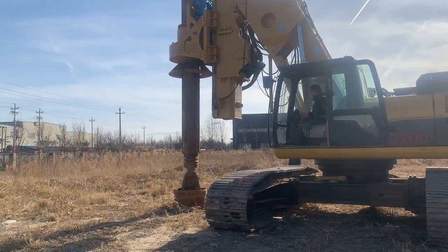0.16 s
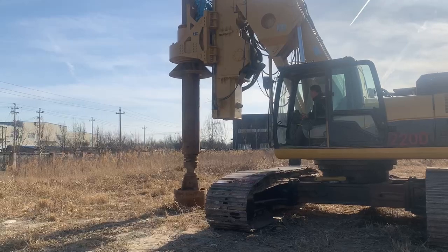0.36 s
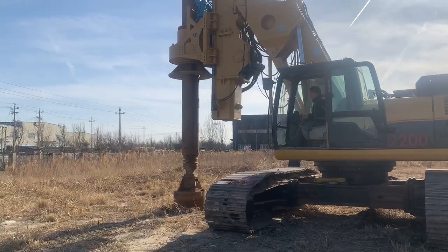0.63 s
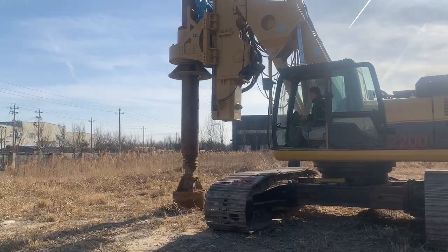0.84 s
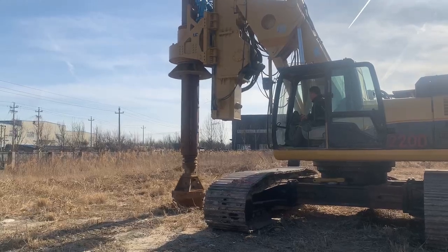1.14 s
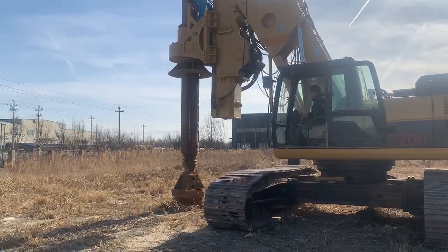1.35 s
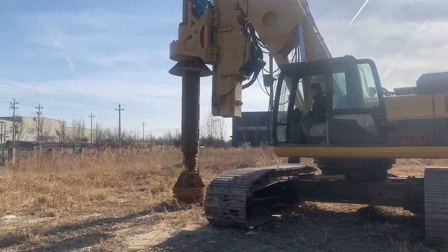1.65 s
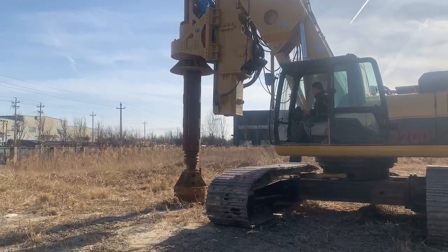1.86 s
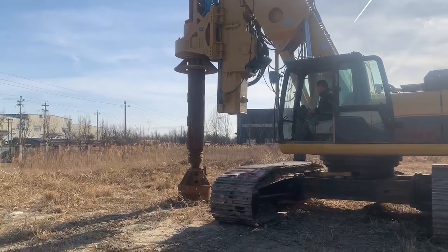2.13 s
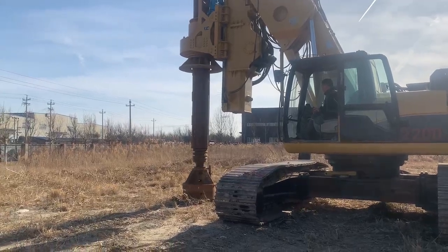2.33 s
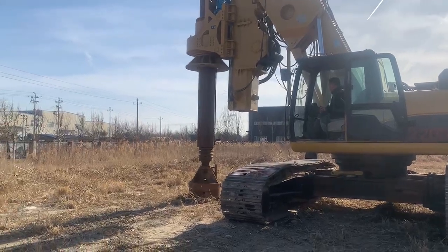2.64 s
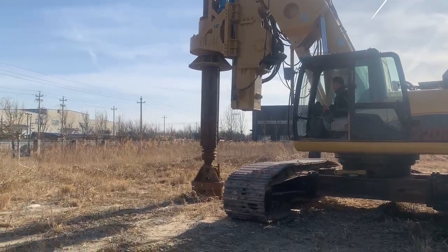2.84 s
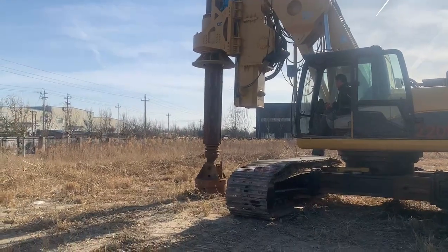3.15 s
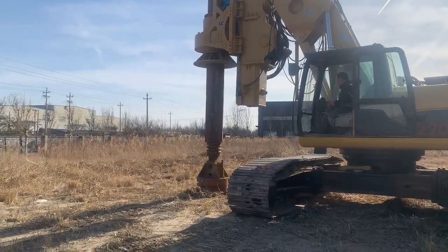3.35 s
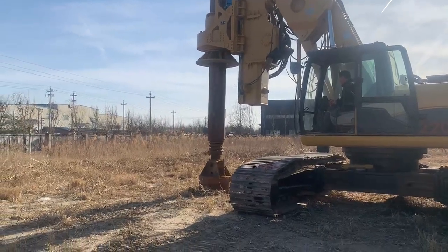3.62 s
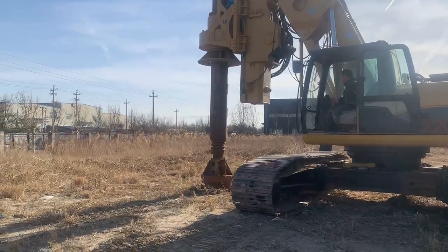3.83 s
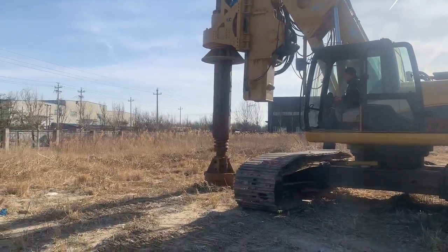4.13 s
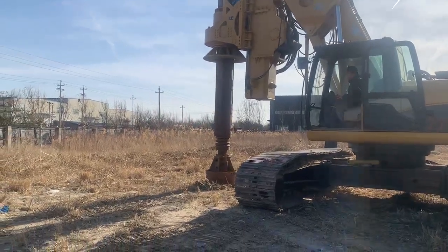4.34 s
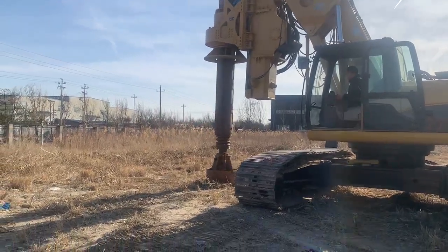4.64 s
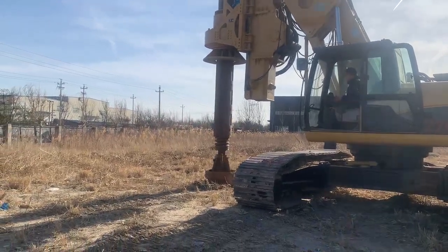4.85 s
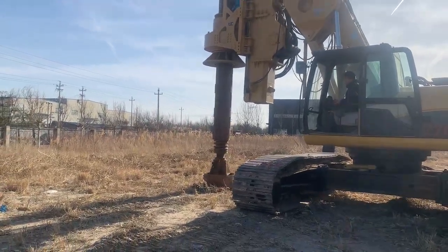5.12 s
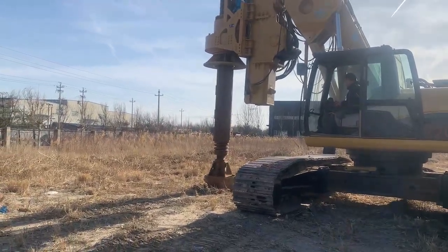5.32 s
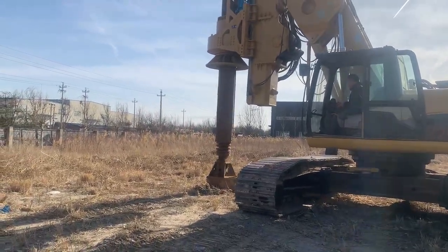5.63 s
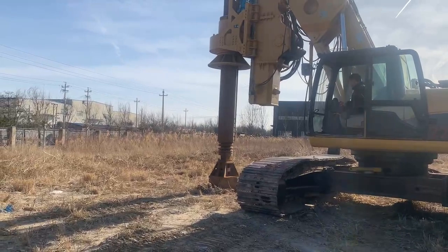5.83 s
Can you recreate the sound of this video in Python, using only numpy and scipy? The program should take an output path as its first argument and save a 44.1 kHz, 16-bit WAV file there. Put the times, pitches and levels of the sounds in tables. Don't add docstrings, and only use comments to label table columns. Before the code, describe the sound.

A big diesel drilling rig drones steadily in an open field while its heavy bar shudders and knocks hard, loudest past the middle.

```python
import sys
import numpy as np
from scipy import signal
from scipy.fft import rfft, irfft
from scipy.io import wavfile

SR = 44100
rng = np.random.default_rng(int(sys.argv[2]) if len(sys.argv) > 2 else 0)


def invert_db(level):
    return 10 ** (np.asarray(level, dtype=float) / 20)


def inscribe(sig):
    pcm = np.round(np.clip(np.atleast_2d(sig).T, -1, 1) * 32767)
    wavfile.write(sys.argv[1], SR, pcm.astype(np.int16))


N = 263718
TIME = np.arange(N) / SR

# (time [s], four-stroke cycle rate [1/s])
ENGINE_SPEED = [(0, 14.80), (1.4, 14.80), (2.2, 14.816), (2.65, 14.81), (3.0, 14.768), (3.8, 14.735),
                (4.2, 14.747), (5.05, 14.75), (5.4, 14.82), (5.98, 14.826)]
# (multiple [per cycle], right level [dB], left minus right [dB], waver [dB])
ENGINE_TONES = [(6, -36, -1, 2), (24, -26, 0, 1.5), (36, -38, -1.5, 3), (48, -29.5, -5, 1.1),
                (60, -42, -3, 3), (9, -46, -2, 2), (15, -47, 0, 2), (21, -41, 1, 2), (27, -40, -1, 2)]
# (time [s], frequency [Hz], level [dB])
FAN_GEAR = [(0, 926, -37), (.22, 921.5, -36), (.45, 925, -36), (2.4, 922, -36), (2.8, 911.5, -37.5),
            (3.3, 908.5, -38), (3.62, 920, -39), (3.9, 913, -38), (4.8, 916, -38), (5.1, 929, -37),
            (5.3, 933, -38), (5.5, 931, -38), (5.98, 935, -38)]
# (multiple [per turn], right level [dB], left minus right [dB], waver [dB])
FAN_TONES = [(3, -27, -2, 0.7), (9, -35.5, 3, 3), (8, -34, 1.5, 15)]
# (time [s], frequency [Hz], level [dB])
VALVE = [(0, 701, -46), (.6, 712, -35), (.95, 722, -25.5), (1.4, 702, -27.5), (2.0, 680, -27),
         (2.5, 670.5, -30), (3.1, 660.2, -38), (3.55, 679.8, -35), (4.15, 680, -26.5), (4.6, 683, -32),
         (5.1, 697, -29), (5.4, 722, -44), (5.98, 670, -72)]
# (time [s], hold [s], clatter level [dB], rumble level [dB])
JOLTS = [(0, 0.083, -44, -24.5), (.31, 0.027, -33, -24.5), (0.446, 0.014, -28.5, -23),
         (2.355, 0.077, -55, -31), (3.46, 0.078, -20.5, -17), (3.656, 0.034, -24.5, -22),
         (3.76, .03, -41, -24), (3.82, 0.022, -29.5, -21.5), (4.608, 0.047, -30.5, -19.5),
         (4.766, 0.062, -32, -27), (5.266, .1, -37, -29)]
# (frequency [Hz], level [dB], T60 [s])
BAR_MODES = [(128, -5.5, 0.078), (166, 0.5, 0.12), (214, 4.5, 0.047), (248, 5, 0.04), (285, 2, 0.11),
             (406, -6, 0.077), (440, -6, 0.027)]
# (frequency [Hz], level [dB], T60 [s])
GUIDE_MODES = [(557, -5, 0.11), (636, 4.5, 0.012), (790, -1.5, 0.031), (940, 2.5, 0.017), (1114, 4, 0.016),
               (1300, -6, 0.036), (1450, -4.5, 0.027), (1730, -5.5, 0.017), (1900, -2.5, 0.0063),
               (2360, -8.5, 0.011), (2510, -7.5, 0.011), (3290, -15.5, 0.012), (3960, -12, 0.005)]
# (time [s], peak level [dB], frequency [Hz], T60 [s])
THUMPS = [(0.307, -5, 185, 0.13), (.337, -4, 184, 0.16), (3.48, -7, 240, 0.066), (3.496, 3.5, 215, 0.048),
          (3.529, -3, 188, .1), (3.566, -10, 242, .06), (3.588, -1.5, 168, 0.13), (3.689, -4, 188, .1),
          (3.745, -6, 163.6, 0.24), (3.811, -7.5, 180, 0.093), (3.915, -4, 176, 0.079),
          (4.612, 1, 240, 0.078), (4.651, 0.5, 284, 0.074), (4.75, -23, 180, 0.052), (4.855, -5, 175, 0.11)]
# (time [s], frequency [Hz], level [dB])
TURBO = [(0, 9620, -49), (2.7, 9740, -51), (3.5, 9695, -51), (4.9, 10090, -50), (5.98, 9740, -55)]
# (frequency [Hz], spectral density [dB per Hz])
HISS = [(1500, -60.5), (3000, -80.5), (4500, -71.5), (6500, -72), (7700, -79.5), (8800, -70),
        (11500, -70.5), (12700, -70), (14000, -91), (16000, -76.5)]
# (frequency [Hz], spectral density [dB per Hz])
ROAR = [(25, -74), (40, -67), (65, -48.5), (110, -53.5), (170, -51), (260, -48.5), (380, -51.5), (500, -59),
        (800, -55.5), (1100, -64), (1600, -65.5), (2200, -73), (3000, -70.5), (5000, -80)]
# (frequency [Hz], bandwidth [Hz], level [dB], share from the engine side [0-1])
PANELS = [(702, 57, -32, 0.9), (1476, 57, -80, 1), (218, 84, -46, 1), (160.4, 5.3, -35.5, 1),
          (1085, 87, -40.5, 0), (1817, 24, -49, 0)]
# (frequency [Hz], left minus right [dB], coherence [0-1])
SHADE = [(60, -1.5, 0.94), (200, -1, 1), (374, 1, 0.84), (685, -5.5, 0.74), (1290, 0, 0.97),
         (1970, -0.5, 0.95), (3140, -4, 0.79), (4060, -4.5, 0.6), (5500, -20.5, 0.47), (6560, -0.5, 0.4),
         (7300, 0.5, 1), (12500, -1, 1), (16200, 3, 0.5)]
# (frequency [Hz],
# phase [turns])
TRAIL = [(0, 0), (2000, .44), (3200, .56), (9000, 1.58), (11600, 2.08), (12500, 2.45), (14300, 2.55),
         (15300, 3)]

RISE_DB_PER_S, CLATTER_FALL_DB_PER_S, RUMBLE_FALL_DB_PER_S = 450, 180, 98
IDLE_CLATTER_DB, IDLE_RUMBLE_DB = -43.5, -39.5
CLATTER_AFTER_DB, RUMBLE_AFTER_DB, AFTERSHAKE_FALL_DB_PER_S = -24, -8.5, 10


def rms_one(x):
    return x / np.sqrt(np.mean(x ** 2) + 1e-20)


def in_time(rows):
    s, *columns = np.transpose(rows)
    return [np.interp(TIME, s, c) for c in columns]


def at_hz(points, hz):
    f, *columns = np.transpose(points)
    return [np.interp(np.log(hz), np.log(f), c) for c in columns]


def drift(rate):
    step = 40
    pole = np.exp(-2 * step * np.pi * rate / SR)
    noise = rng.standard_normal(N // step + 2002)
    slow = signal.lfilter([1], [1, -2 * pole, pole * pole], noise)[2000:]
    return np.interp(np.arange(N) / step, np.arange(len(slow)), rms_one(slow))


def ring(x, hz, t60):
    radius = invert_db(-60 / (t60 * SR))
    angle = 2 * np.pi * hz / SR
    return signal.lfilter([0, np.sin(angle)], [1, -2 * radius * np.cos(angle), radius ** 2], x + 1e-18)


def late(x, share=1):
    turns = np.interp(np.fft.rfftfreq(N, 1 / SR), *np.transpose(TRAIL))
    return irfft(rfft(x) * np.exp(-2j * np.pi * share * turns), N)


def tones(turns, table, lag_s):
    both = np.array([np.interp(TIME - lag_s, TIME, turns), turns])
    out = 0
    for times, level_db, shade_db, waver_db in table:
        swell_db = np.clip(waver_db * drift(6), -9, 3.5)
        gain = invert_db(level_db + swell_db) * invert_db([[shade_db], [0]])
        out = out + gain * np.cos(2 * np.pi * round(times) * both + 0.95)
    return np.sqrt(2) * out


def whistle(table, flutter_db, flutter_hz, rate, shade_db):
    hz, level_db = in_time(table)
    sine = np.sin(2 * np.pi * np.cumsum(hz + flutter_hz * drift(rate)) / SR)
    sound = invert_db(level_db + flutter_db * drift(rate)) * sine
    return np.array([invert_db(shade_db) * late(sound), sound])


def airborne_noise(spectrum, low_hz, high_hz, patchy_db):
    direct, diffuse = np.zeros((2, N)), np.zeros((2, N))
    white = rng.standard_normal((2, 3, N))
    edges = low_hz * 2 ** np.arange(0, np.log2(high_hz / low_hz), 1 / 3)
    for k, (low, high) in enumerate(zip(edges, edges[1:])):
        band_filter = signal.butter(2, [low, high], "band", fs=SR, output="sos")
        bands = signal.sosfilt(band_filter, white[k % 2])
        centre = np.sqrt(low * high)
        shade_db, alike = at_hz(SHADE, centre)
        alike = np.clip(alike, 0, 1)
        level_db = at_hz(spectrum, centre)[0] + patchy_db * drift(7.3)
        gain = invert_db(level_db) * invert_db([[shade_db], [0]])
        direct += gain * np.sqrt(alike) * bands[0]
        diffuse += gain * np.sqrt(1 - alike) * bands[1:]
    direct[0] = late(direct[0])
    return (direct + diffuse) * np.sqrt(SR / 2)


def pump(cycles):
    return tones(cycles, [(12, -23.5, 0.0057, 1.97)], lag_s=0.00025)


def fan():
    hz, whine_db = in_time(FAN_GEAR)
    turns = np.cumsum(hz) / SR / 31
    whine = invert_db(whine_db) * tones(turns, [(31, 3.0, -4.0, 2.1)], lag_s=0.00016)
    sixth = tones(turns + 0.088, [(6, -35.5, 0, 4.4)], lag_s=0.00019)
    return whine + sixth + tones(turns, FAN_TONES, lag_s=0.00039)


def engine(cycles):
    return tones(cycles, ENGINE_TONES, lag_s=0.00028)


def valve():
    return whistle(VALVE, flutter_db=2.5, flutter_hz=4, rate=9, shade_db=-4)


def jolted(peak_db, fall_db_per_s, after_db, idle_db):
    time, power = TIME[::64], invert_db(2 * idle_db)
    for (s, hold_s, *_), top_db in zip(JOLTS, peak_db):
        after = np.maximum(time - s - hold_s, 0)
        rise = invert_db(2 * (top_db - RISE_DB_PER_S * np.maximum(s - time, 0)))
        fall = invert_db(-2 * fall_db_per_s * after)
        aftershake = invert_db(2 * (after_db - AFTERSHAKE_FALL_DB_PER_S * after))
        power = power + rise * (fall + aftershake)
    return np.interp(TIME, time, np.sqrt(power))


def contacts(modes, per_s):
    sizes = rng.standard_normal(N) * invert_db(2.0 * np.minimum(rng.exponential(1, N), 3))
    out = 0
    for hz, level_db, t60 in modes:
        hits = (rng.random(N) < per_s / SR) * sizes
        out = out + invert_db(level_db) * ring(hits, hz, t60)
    return rms_one(out)


def drill_bar():
    clatter_db, rumble_db = np.transpose(JOLTS)[2:]
    clatter = jolted(clatter_db, CLATTER_FALL_DB_PER_S, CLATTER_AFTER_DB, IDLE_CLATTER_DB)
    rumble = jolted(rumble_db, RUMBLE_FALL_DB_PER_S, RUMBLE_AFTER_DB, IDLE_RUMBLE_DB)
    out = rumble * contacts(BAR_MODES, per_s=370) + clatter * contacts(GUIDE_MODES, per_s=1600)
    for s, level_db, hz, t60 in THUMPS:
        blow = invert_db(level_db - 5.0) * signal.unit_impulse(N, round(s * SR))
        soft_blow = signal.lfilter([.04], [1, -.96], blow)
        out += ring(soft_blow, hz, t60)
    return out


def turbo():
    return whistle(TURBO, flutter_db=4, flutter_hz=35.5, rate=29, shade_db=-1.0)


def hiss(cycles):
    since = cycles + 0.25
    part = since % 1
    puff = 13.1 * part * np.exp(-part / 0.11) / .5
    strength = invert_db(2.0 * np.clip(rng.standard_normal(100), -2, 1.5))[since.astype(int)]
    flutter = invert_db(0.79 * drift(70) + 0.05 * drift(13.0))
    swell = (0.72 + 0.43 * strength * puff) * flutter
    return swell * airborne_noise(HISS, 1433, 18500, patchy_db=1.23)


def roar(cycles):
    firing = 12 * np.pi * cycles
    throb = invert_db(0.85 * np.cos(firing) + 0.93 * np.cos(2 * firing))
    out = throb * airborne_noise(ROAR, 21.97, 6000, patchy_db=1.32)
    for hz, width_hz, level_db, share in PANELS:
        t60 = np.log(1000) / np.pi / width_hz
        panel = invert_db(level_db) * rms_one(ring(rng.standard_normal(N), hz, t60))
        left = invert_db(share * at_hz(SHADE, hz)[0]) * late(panel, share)
        out += np.array([left, panel])
    return out


def scene():
    cycles = np.cumsum(in_time(ENGINE_SPEED)[0]) / SR
    machine = pump(cycles) + fan() + engine(cycles) + valve()
    bar = drill_bar() * invert_db([[.3], [0]])
    return machine + bar + turbo() + hiss(cycles) + roar(cycles)


def roll_off(x):
    return signal.sosfilt(signal.butter(12, 17010, fs=SR, output="sos"), x)


def record(dry):
    headroom = 1.5
    thin = signal.sosfilt(signal.butter(3, 46, "high", fs=SR, output="sos"), dry)
    rounded = headroom * np.tanh(thin / headroom)
    cut = signal.sosfilt(signal.ellip(10, .5, 70, 15600, fs=SR, output="sos"), rounded)
    return roll_off(cut)


dry = scene()
out = record(dry)
inscribe(out)
```